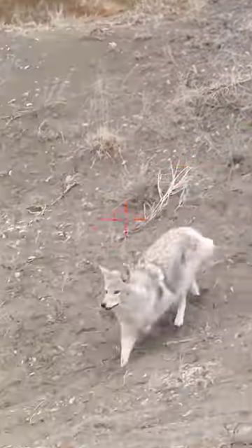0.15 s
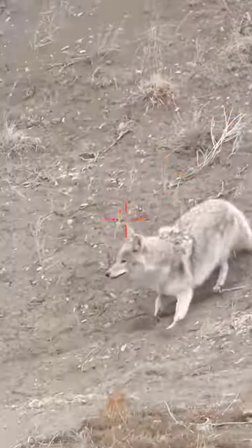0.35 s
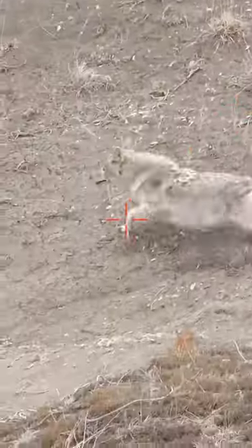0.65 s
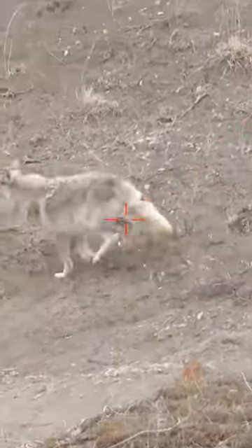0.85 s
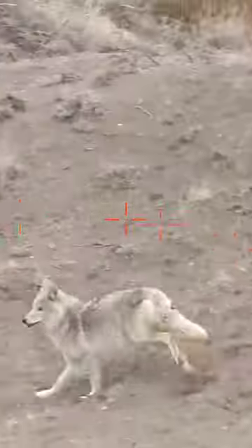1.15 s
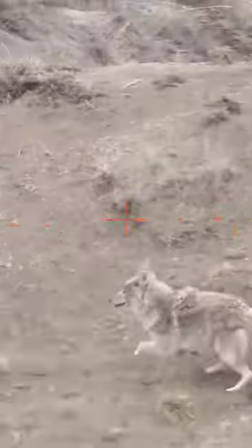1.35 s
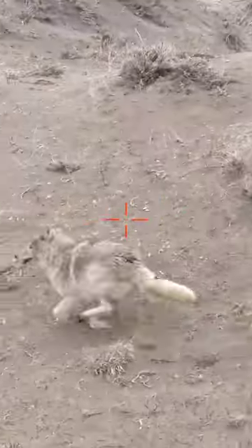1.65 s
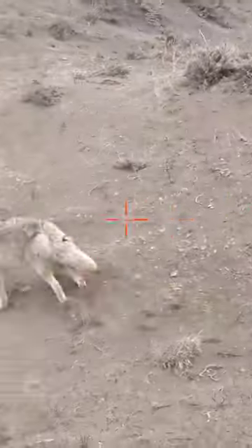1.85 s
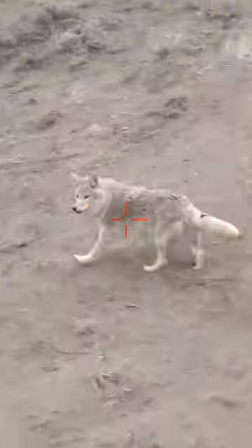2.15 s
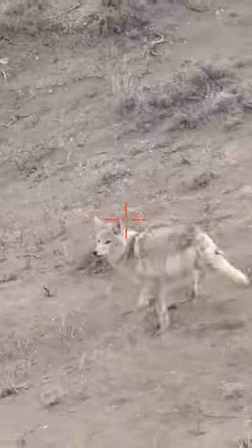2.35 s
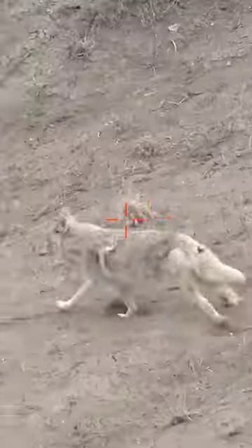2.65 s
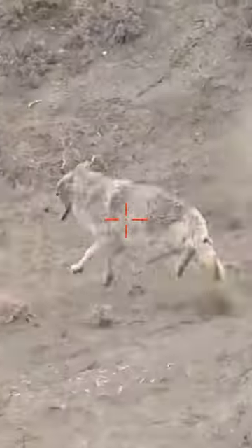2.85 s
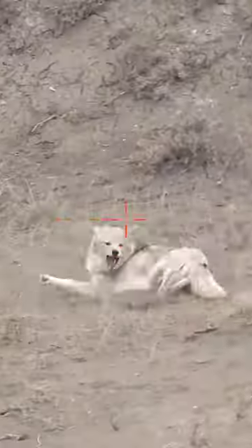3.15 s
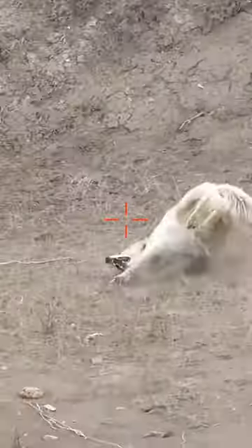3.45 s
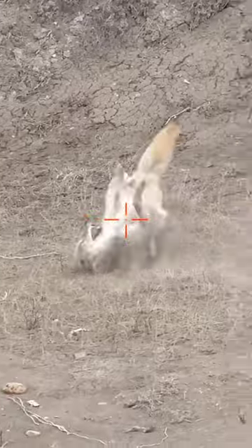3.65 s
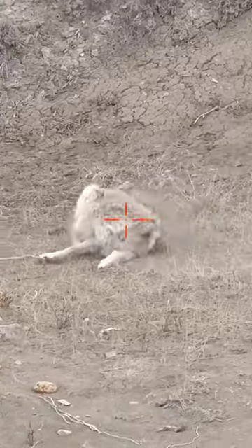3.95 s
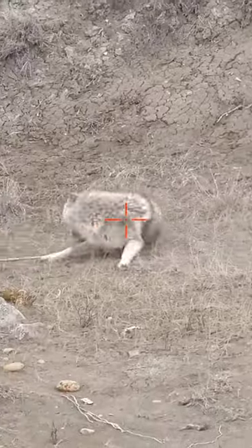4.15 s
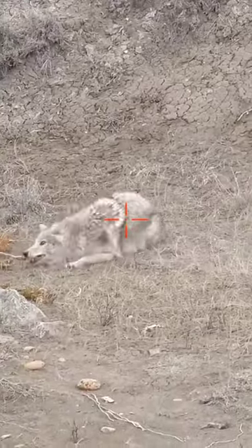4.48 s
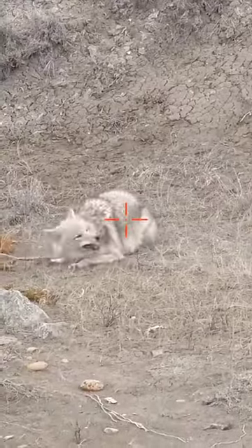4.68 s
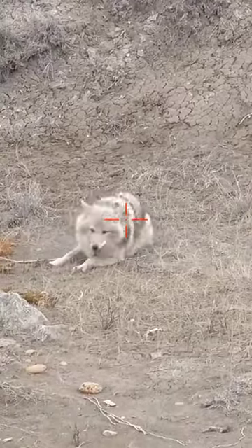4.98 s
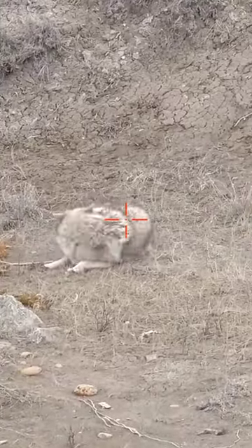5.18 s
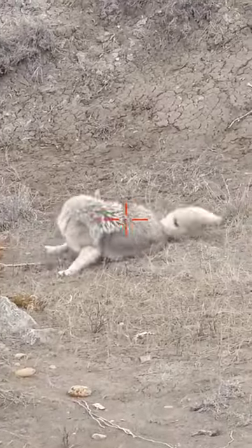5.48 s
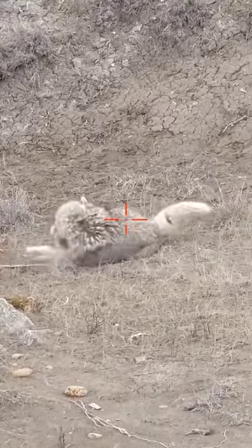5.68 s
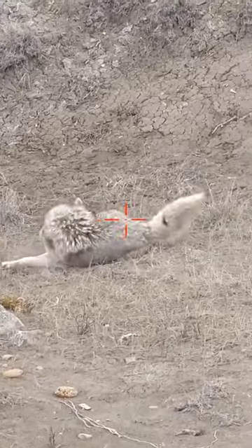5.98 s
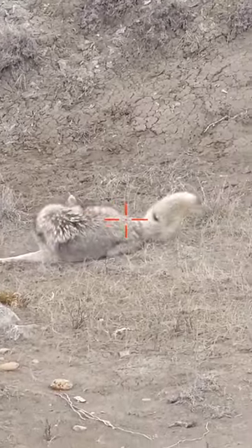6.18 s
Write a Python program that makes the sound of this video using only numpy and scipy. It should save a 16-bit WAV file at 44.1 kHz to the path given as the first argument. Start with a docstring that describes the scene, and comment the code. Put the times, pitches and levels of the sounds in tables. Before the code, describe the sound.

On open, breezy land, faint thin squeals glide up and down with tiny gear ticks close to the microphone. A rifle fires very near, overloading the input; slopes throw back its crack, a low bullet thud lands, and a dull roll dies away. The sound then widens, with wind buffeting the left while a coyote off to the left yelps and cries hoarsely, its voice echoing, amid cloth rustles and clicks.

```python
"""Thin, bird-like squeals carry over open, breezy land: gliding tones with a husky half tone.
A rifle fires close by: a noise blast and a pressure pulse. Slopes and banks return its crack as noise bursts;
the bullet's thud comes back as damped low tones. Off to the left a coyote yelps, cries and barks in harmonics.
Filtered clicks of gear and noise rustles of cloth lie at the microphone.
The sound is mono until just after the shot, then wide."""
import sys
import numpy as np
from scipy import signal
from scipy.fft import rfft, irfft
from scipy.io import wavfile

SR = 44100
rng = np.random.default_rng(int(sys.argv[2]) if len(sys.argv) > 2 else 0)


def store_wav(level_fs):
    """Save 16-bit WAV to argv[1]."""
    pcm = np.round(np.clip(np.atleast_2d(level_fs), -1, 1) * 32767)
    wavfile.write(sys.argv[1], SR, pcm.T.astype(np.int16))


N = 278712
T = np.arange(N) / SR
SHOT_S = 2.7624


def amp(db):
    """Decibels to gain."""
    return 10 ** (np.asarray(db) / 20)


def unit(x):
    """Scales to rms 1."""
    return x / np.sqrt(np.mean(x ** 2) + 1e-20)


def level(rows):
    """Gain over time from (time_s, level_db) rows."""
    return amp(np.interp(T, *np.transpose(rows)))


def noise(colour):
    """Noise of rms 1 shaped by (frequency_hz, relative_db) rows."""
    hz, db = np.transpose(colour)
    f = np.fft.rfftfreq(N, 1 / SR)
    gain = amp(np.interp(np.log(f + 1), np.log(hz + 1), db))
    return unit(irfft(rfft(rng.standard_normal(N)) * gain, N))


def wander(hz):
    """Smooth random signal of rms 1, mostly slower than hz."""
    f = np.fft.rfftfreq(N, 1 / SR)
    return unit(irfft(rfft(rng.standard_normal(N)) * np.exp(-(f / hz) ** 2), N))


def burst(peak_s, rise_s, decay_s):
    """Envelope that swells exponentially up to peak_s and dies away."""
    exponent = np.minimum((T - peak_s) / rise_s, (peak_s - T) / decay_s)
    return np.exp(np.maximum(exponent, -40))


def swells(rows):
    """Joint envelope of (peak_s, level_db, rise_s, decay_s) rows, added in power."""
    return np.sqrt(sum((amp(db) * burst(s, rise_s, decay_s)) ** 2 for s, db, rise_s, decay_s in rows))


def pan(db):
    """Left and right gains, db apart, with mean 1; positive is left."""
    gains = amp([[db / 2], [-db / 2]])
    return gains / gains.mean()


def land(x, t60_s, build_s):
    """Sparse reflections off uneven ground, building up and dying away."""
    t = T[:SR]
    taps = rng.standard_normal(SR) * (rng.random(SR) < 2000 / SR)  # about 2000 a second
    taps *= amp(-60 * t / t60_s) * (1 - np.exp(-t / build_s))
    return signal.fftconvolve(x, taps / np.linalg.norm(taps))[:N]


def note(start_s, length_s, attack_s, release_s):
    """The samples of one call, a soft gate over them, and its progress from 0 to 1."""
    edges = np.minimum((T - start_s) / attack_s, (start_s + length_s - T) / release_s)
    gate = np.clip(edges + .5, 0, 1)
    on = gate > 0
    return on, gate[on], np.clip((T[on] - start_s) / length_s, 0, 1)


def near_air(air_db=-63.0, breeze_db=0.4, lull_db=-58):
    """Steady hiss and soft puffs of wind that never drop below a lull, in mono."""
    # puffs of wind on the microphone: time_s, relative_db
    puffs = [(0.0, -45), (0.25, -43), (0.36, -63), (0.42, -54), (0.82, -38.5), (0.99, -64), (1.27, -54.5),
             (1.46, -73), (1.49, -41.5), (1.87, -38.5), (2.07, -69), (2.21, -52.5), (2.74, -45)]
    # spectra: frequency_hz, relative_db
    air_colour = [(300, -5.5), (750, -7), (2600, -16.5), (4200, -15), (6000, -18), (15000, -18.5)]
    breeze_colour = [(20, -7.5), (55, 4.5), (140, 2), (270, -10.5), (500, -27), (2000, -37), (15000, -48)]
    strength = np.hypot(amp(breeze_db) * level(puffs), amp(lull_db))
    return amp(air_db) * noise(air_colour) + strength * noise(breeze_colour)


def wide_air(field_db=-44, wind_db=-42, crinkle_db=2.0):
    """Wind buffets the left port; the field murmurs and cloth rustles on both sides."""
    # strongest buffets: peak_s
    gust_times = [3.78, 4.069, 4.228, 4.72, 4.82, 5.058, 5.679, 5.85, 6.31]
    gust_db, gust_rise_s, gust_decay_s = -29.5, 0.019, 0.031
    # swishes of clothes and grass: peak_s, level_db, rise_s, decay_s
    swishes = [(4.175, -36.5, 0.037, .08), (5.955, -41, 0.059, .14)]
    # soft continuous rustle: time_s, level_db
    stir = [(3.3, -55), (3.68, -48.5), (3.95, -63), (4.3, -49.5), (4.7, -59), (5.15, -49), (5.65, -57),
            (6.3, -48.5)]
    # spectra: frequency_hz, relative_db
    gust_colour = [(20, -9), (45, -1), (65, 3.5), (85, -1.5), (120, -8.5), (200, -21.5), (400, -33),
                   (1200, -65)]
    field_colour = [(60, -5.5), (150, 1), (400, -6), (650, -12), (1000, -15.5), (1600, -19.5), (3500, -31),
                    (5200, -26), (7000, -34), (15000, -35.5)]
    rustle_colour = [(200, 6.5), (1500, 4), (4000, -0.5), (7000, -0.5), (10000, -3.5), (15000, -9)]

    buffets = swells([(s, gust_db, gust_rise_s, gust_decay_s) for s in gust_times])
    push = np.hypot(amp(wind_db), buffets)
    gusts = np.array([noise(gust_colour) for side in range(2)]) * push * pan(50)

    field = np.array([noise(field_colour) * amp(wander(5.0)) for side in range(2)]) * pan(4.1)
    field *= level([(3.4, 7), (4, 2), (4.7, 0), (6.3, 2)])  # time_s, relative_db

    rustle = np.array([noise(rustle_colour) * unit(amp(crinkle_db * wander(130))) for side in range(2)])
    rustle *= np.hypot(level(stir), swells(swishes)) * pan(-1.9)
    return gusts + amp(field_db) * field + rustle


def clicks(cycles=4.3, ring_db=-22, ring_decay_s=0.014, edge_hz=5000):
    """Ticks, knocks and the clap: band-passed contacts; lower ones last longer, higher have a bright edge."""
    # the first echo, a hollow clap: start_s, peak_db, centre_hz
    clap = (2.8084, -4.5, 1797)
    # bright ticks of the gear: start_s, peak_db
    ticks = [(.102, -45), (.589, -42.5), (1.6068, -33.5), (1.716, -30), (2.619, -39), (3.866, -19),
             (5.109, -33), (5.839, -35)]
    # dull knocks of handling: start_s, peak_db
    knocks = [(.638, -45.5), (1.488, -41.5), (2.285, -38), (4.047, -32), (4.11, -31), (4.148, -28.5),
              (6.253, -29.5)]
    tick_hz, knock_hz = 2960, 730
    events = [clap] + [(*row, tick_hz) for row in ticks] + [(*row, knock_hz) for row in knocks]

    out, t = np.zeros(N), T[:SR // 20]
    for start_s, peak_db, hz in events:
        decay = np.exp(-t * hz / cycles) + amp(ring_db) * np.exp(-t / ring_decay_s)
        contact = rng.standard_normal(len(t)) * decay
        band_hz = [hz / 2, min(hz * 1.6, SR / 2 - 1000)]
        click = signal.lfilter(*signal.butter(2, band_hz, "band", fs=SR), contact)
        click += contact * (hz / edge_hz) ** 2
        part = out[round(start_s * SR):][:len(t)]
        part += (amp(peak_db) * click / abs(click).max())[:len(part)]
    return out


def squeals(octave_db=-9, bright_hz=5370, bright_width_hz=190, half_db=-18, bow=0.52, jitter=0.011,
            fade_s=.008, wet_db=-10):
    """Thin, arched glides with a husky half tone; the octave shows where it crosses one high resonance."""
    # a squeal sweeps up, flips to a high top and falls back in two steps
    # by note name: delay_s, length_s, from_hz, to_hz, relative_db
    phrase_notes = {"rise": (-.083, .07, 1850, 2620, 1), "top": (0, .064, 3180, 3300, -4),
                    "fall": (.064, .105, 2770, 2430, 0), "sob": (.158, .105, 2210, 1940, -4.5)}
    # squeals: flip_s, level_db, stretch_factor, note_names
    phrases = [(.128, -58.5, 1.05, "top fall"), (.525, -61.5, 1.17, "top fall"),
               (.919, -61, 0.9, "rise top fall sob"), (1.452, -63, 0.97, "rise top fall sob"),
               (1.569, -65, .95, "rise top fall sob"), (1.953, -61.5, 0.93, "rise")]
    # lone peeps before, among and after them: start_s, length_s, from_hz, to_hz, level_db
    peeps = [(0, 0.03, 2540, 2730, -51.5), (.32, 0.023, 2730, 2490, -62), (1.77, 0.16, 2700, 2480, -73),
             (2.1, .072, 3000, 2900, -65.5), (2.2, .08, 2165, 2160, -69.5), (2.45, .047, 3500, 2260, -66.5),
             (2.685, .04, 2080, 2090, -62)]
    glides = list(peeps)
    for flip_s, phrase_db, stretch, names in phrases:
        for name in names.split():
            delay_s, length_s, from_hz, to_hz, db = phrase_notes[name]
            start_s = flip_s + stretch * delay_s
            glides.append((start_s, stretch * length_s, from_hz, to_hz, phrase_db + db))

    out, waver, husk = np.zeros(N), 1 + jitter * wander(248), wander(300)
    for start_s, length_s, from_hz, to_hz, db in glides:
        on, gate, u = note(start_s, length_s, fade_s, fade_s)
        hz = from_hz + (to_hz - from_hz) * u
        hz += bow * abs(to_hz - from_hz) * u * (1 - u)
        phase = 2 * np.pi * np.cumsum(hz * waver[on]) / SR
        octave = amp(octave_db) / np.hypot(1, (2 * hz - bright_hz) / (bright_width_hz / 2))
        half = husk[on] * np.sin(1.5 * phase)
        voice = np.sin(phase) + octave * np.sin(2 * phase) + amp(half_db) * half
        out[on] += np.sqrt(2) * gate * amp(db) * voice
    return out + amp(wet_db) * land(out, t60_s=.5, build_s=0.016)


def bark(hz=318, jitter=0.079, bark_db=-41.5):
    """One low, gruff bark: jittered harmonics in two pushes."""
    # harmonics from the first up: relative_db
    harmonics = [-12, 1.5, 4.5, -5, -14, -5.5, -16, -7]
    # two pushes: time_s, relative_db
    effort = [(5.172, -89), (5.181, 0.5), (5.21, 0.5), (5.25, -9), (5.285, 0.5), (5.32, -77)]
    phase = 2 * np.pi * np.cumsum(hz * (1 + jitter * wander(200))) / SR
    voice = sum(amp(db) * np.sin(k * phase) for k, db in enumerate(harmonics, 1))
    return amp(bark_db) * voice * level(effort)


def arch(u, from_hz, top_hz, to_hz, top_at, power=1.25):
    """Pitch runs from its start through its top to its end; power 1 is pointed, 2 round."""
    away = np.interp(u, [0, np.clip(top_at, .02, .98), 1], [1, 0, 1])
    end_hz = np.where(u < top_at, from_hz, to_hz)
    return top_hz + (end_hz - top_hz) * away ** power


def throat(hz):
    """Gain of the throat's resonances at a frequency."""
    # resonances that lift the upper harmonics: centre_hz, width_hz, gain_db
    resonances = [(2700, 320, -3.5), (4100, 400, -13)]
    return sum(amp(db) / np.hypot(1, (hz - centre_hz) / (width_hz / 2)) for centre_hz, width_hz, db in resonances)


def cries(jitter=0.068, shimmer=1.0, tremble_db=2.37, half_db=-3, rasp_db=-4,
          attack_s=.013, release_s=0.021, fade_db=-4.5):
    """High, strained vocal folds; in rough yelps they break into half tones and rasp."""
    # pitch arches: start_s, length_s, from_hz, top_hz, to_hz, top_at_0_1, initial_level_db,
    # octave_relative_db, roughness_0_1
    calls = [(3.282, .12, 1965, 1980, 1926, .2, -44.5, -22, .1),
             (3.396, 0.04, 883, 1061, 1040, 0.8, -39, -22, 0.44),
             (3.528, 0.12, 1470, 1684, 1240, 0.27, -41.5, -22, 0.37),
             (3.778, 0.0406, 1080, 1358, 1340, 0.94, -44, -4.5, .42),
             (4.41, 0.14, 1292, 1450, 1380, .5, -55.5, -19, 0.66),
             (4.768, 0.074, 1120, 1350, 1340, 0.74, -42, -32, 0.93),
             (4.87, .12, 1022, 1380, 1280, .5, -37.5, -8.5, 0.29),
             (4.856, .1, 1860, 2290, 2294, 0.67, -42, -30, .3),
             (5.183, .095, 980, 1370, 1294, .45, -44.5, -1.5, .33),
             (5.321, .066, 1740, 2230, 2230, .97, -35.5, -26, 0.21),
             (5.349, .145, 981, 1136, 965, .28, -41.5, -10.5, 0.2),
             (5.553, .15, 1740, 1974, 1887, .33, -35, -16, 0.22),
             (5.86, 0.13, 1241, 1653, 1163, 0.39, -44.5, -4, 0.31),
             (5.98, 0.07, 1157, 1138, 1135, 0.53, -47.5, 6.5, 0.13),
             (6.04, .14, 1169, 1631, 1176, 0.54, -32, -16.5, .21)]
    # rasp spectrum: frequency_hz, relative_db
    rasp_colour = [(200, -18), (700, -13), (1300, -35), (1650, 6), (2100, 4.5), (2750, 9.5), (3400, -20),
                   (4100, -17.5), (9000, -48)]
    out, waver, flutter, rasp = np.zeros(N), wander(267), wander(390), noise(rasp_colour)
    tremble = tremble_db * wander(35)
    for start_s, length_s, from_hz, top_hz, to_hz, top_at, db, octave_db, rough in calls:
        on, gate, u = note(start_s, length_s, attack_s, release_s)
        hz = arch(u, from_hz, top_hz, to_hz, top_at)
        phase = 2 * np.pi * np.cumsum(hz * (1 + jitter * rough * waver[on])) / SR
        first = amp(db + fade_db * u ** 2 + tremble[on])
        second = first * amp(octave_db)
        upper = sum(throat(k * hz) * np.sin(k * phase) for k in range(3, 5))
        halves = np.sin(1.5 * phase) + np.sin(2.5 * phase)
        voice = first * np.sin(phase) + second * (np.sin(2 * phase) + upper)
        voice += rough * np.minimum(first, second) * amp(half_db) * halves
        # rasp pulses with the vocal folds
        voice += rough * np.sqrt(first * second) * amp(rasp_db) * rasp[on] * (1 + .5 * np.cos(phase))
        out[on] += np.sqrt(2) * gate * voice * (1 + shimmer * rough * flutter[on])
    return out


def valley(x, direct_db=-1.5, near_db=-7, far_db=-6, echo_s=0.2, echo_db=-15):
    """A voice off to the left: nearby ground blurs it, the hills and one far bank return it."""
    near = np.array([land(x, t60_s=0.18, build_s=0.0085) for side in range(2)])
    far = np.array([land(x, t60_s=1.54, build_s=0.0046) for side in range(2)])
    echo = np.array([np.interp(T - echo_s, T, side) for side in near])
    returns = amp(near_db) * near + amp(far_db) * far + amp(echo_db) * echo
    return amp(direct_db) * x * pan(32) + returns * pan(17.2)


def far_echoes(tail_db=-35, tail_decay_s=0.21, grain_db=2.0, swell_rise_s=.003):
    """Distant slopes return a dull, dying roll with a few swells."""
    # swells in the roll: peak_s, level_db, decay_s
    far_swells = [(3.233, -36, 0.017), (3.281, -36.5, 0.0028), (3.317, -36.5, 0.013)]
    # spectrum: frequency_hz, relative_db
    tail_colour = [(200, -17.5), (550, -13), (900, 1), (3300, -0.5), (4800, -7.5), (15000, -43)]
    roll = amp(tail_db) * burst(3.107, .04, tail_decay_s)
    roll += sum(amp(db) * burst(s, swell_rise_s, decay_s) for s, db, decay_s in far_swells)
    grain = unit(amp(grain_db * wander(300)))
    return roll * (T > SHOT_S) * noise(tail_colour) * grain


def thud(start_s=3.0335, rise_cycles=0.51):
    """The bullet's hit: a short slap and a few low swings, as damped sines."""
    # modes: frequency_hz, level_db, t60_s
    modes = [(123.5, 0, 0.061), (234, -5.5, 0.036), (540, -5.5, 0.012), (1076, 4.5, 0.0072)]
    t = np.maximum(T - start_s, 0)
    out = np.zeros(N)
    for hz, db, t60_s in modes:
        decay = amp(db - 60 * np.minimum(t / t60_s, 2))
        out += decay * (1 - np.exp(-t * hz / rise_cycles)) * np.sin(2 * np.pi * hz * t)
    return out


def shot(blast_db=0, blast_decay_s=0.011, push_db=-4, push_s=.0007, grain_db=2.5, bank_db=-10.0):
    """The muzzle blast, then the crack scattered back from ever farther ground."""
    # crack scattered by stretches of slope: peak_s, level_db, rise_s, decay_s
    slope_rows = [(2.812, -19.5, 0.0086, .007), (2.88, -9.5, 0.04, 0.045), (2.968, -11, 0.0057, 0.053),
                  (3.028, -15, .015, 0.016), (3.062, -17, 0.0058, 0.02)]
    # sharp echoes off single banks: peak_s, relative_db
    bank_rows = [(2.8187, 8.5), (2.964, -10), (3.005, -10), (3.025, -3), (3.056, -3.5)]
    # spectra: frequency_hz, relative_db
    blast_colour = [(35, -21.5), (100, -8), (300, -8.5), (750, -5.5), (1400, -11.5), (3500, -6.5),
                    (6000, -11.5), (10000, -12), (15000, -17.5)]
    echo_colour = [(88, -52.5), (150, -6.5), (350, -26), (728, -18), (991, -17), (1640, -6.5), (2450, -5.5),
                   (3540, 3), (4540, -9), (5200, -11), (6180, -15), (15000, -28)]

    blast = amp(blast_db) * noise(blast_colour) * burst(SHOT_S, .0001, blast_decay_s)
    u = np.maximum(T - SHOT_S, 0) / push_s
    blast += amp(push_db) * (T > SHOT_S) * (1 - u) * np.exp(-u)  # the pressure pulse and its suction

    slopes = swells(slope_rows) * (T > SHOT_S)
    slopes *= np.exp(-np.maximum(T - 3.075, 0) / 0.02)  # the ridge ends the near echoes
    grain = unit(amp(grain_db * wander(300)))
    banks = sum(amp(db + bank_db) * burst(s, 0.00057, 0.0026) for s, db in bank_rows)
    return blast + (slopes * grain + banks) * noise(echo_colour)


def scene(wide_s=3.28, opening_s=0.031):
    """All sources; the background opens from mono to stereo after the shot."""
    wide = np.clip((T - wide_s) / opening_s + .5, 0, 1)
    background = (1 - wide) * near_air() + wide * wide_air()
    centre = clicks() + squeals() + far_echoes() + thud() + shot()
    return background + centre + bark() * pan(7.2) + valley(cries())


def record(dry, edge_hz=15650):
    """The blast overloads the input and clips; then the band limit."""
    lowpass = signal.firwin(401, edge_hz, window=("kaiser", 8), fs=SR)
    return signal.oaconvolve(np.clip(dry, -1, 1), lowpass[None], "same")


dry = scene()
out = record(dry)
store_wav(out)
```